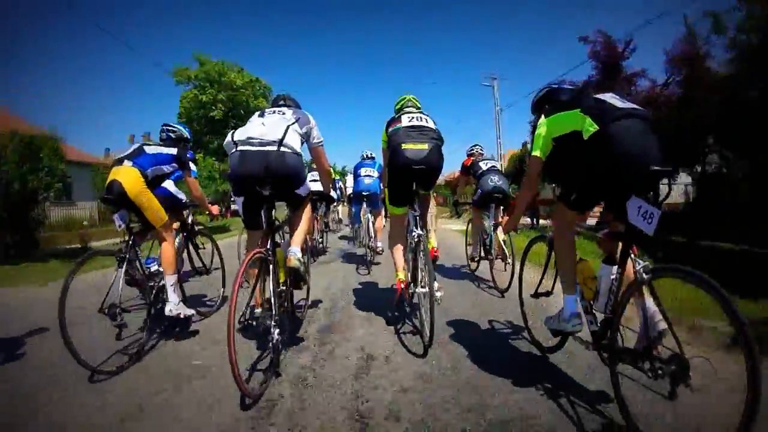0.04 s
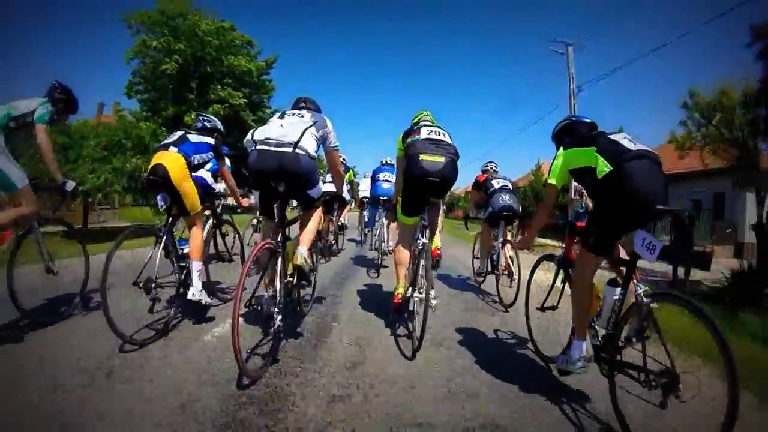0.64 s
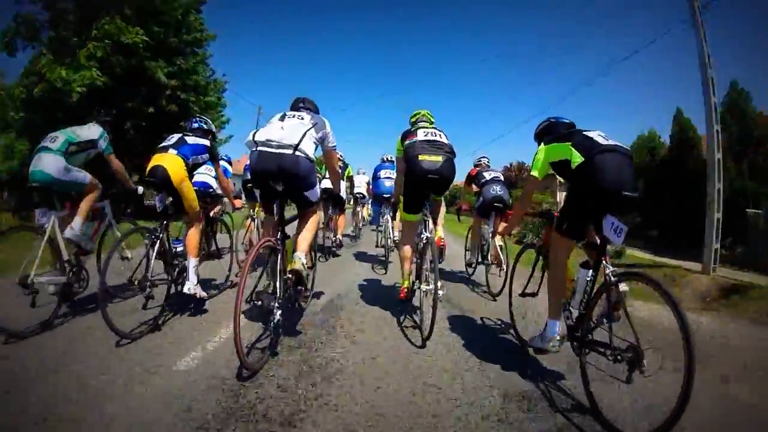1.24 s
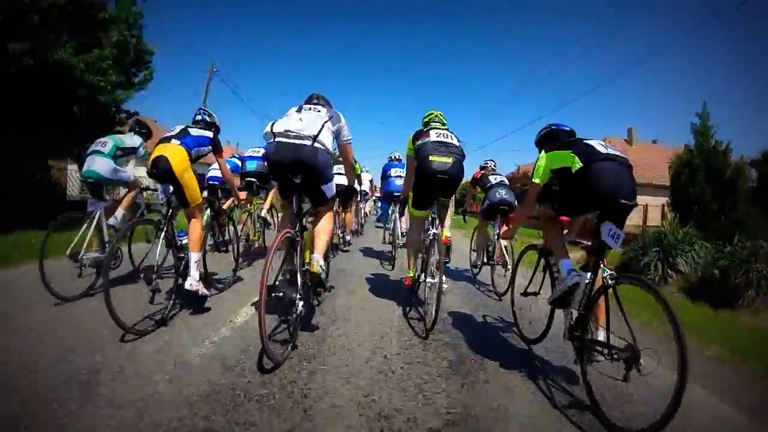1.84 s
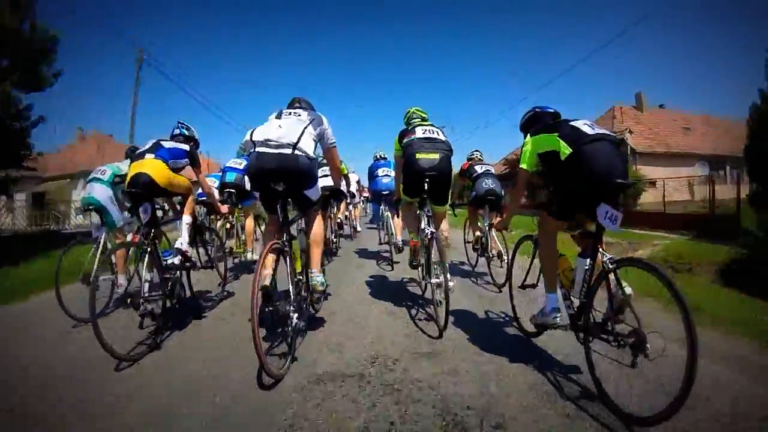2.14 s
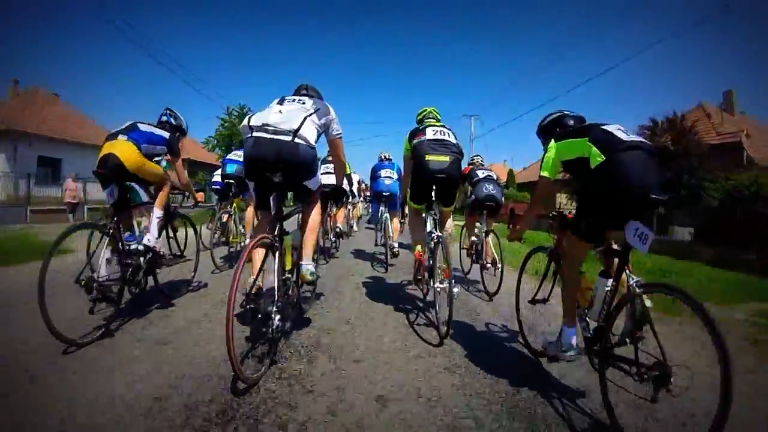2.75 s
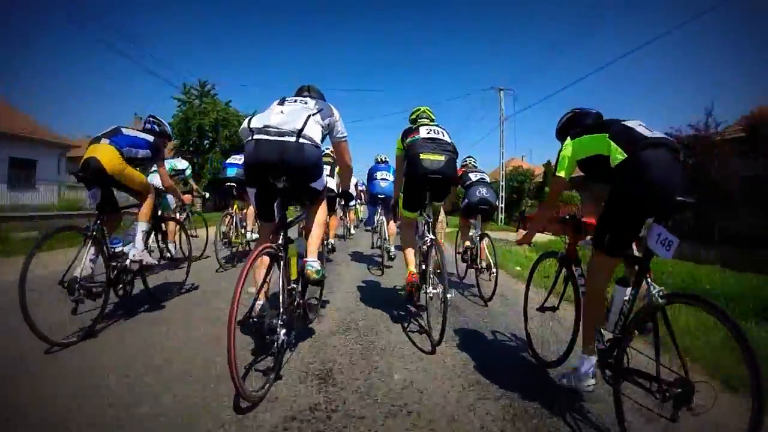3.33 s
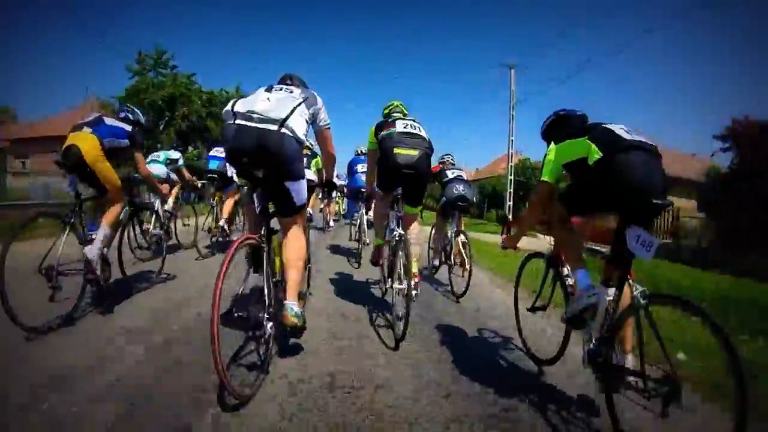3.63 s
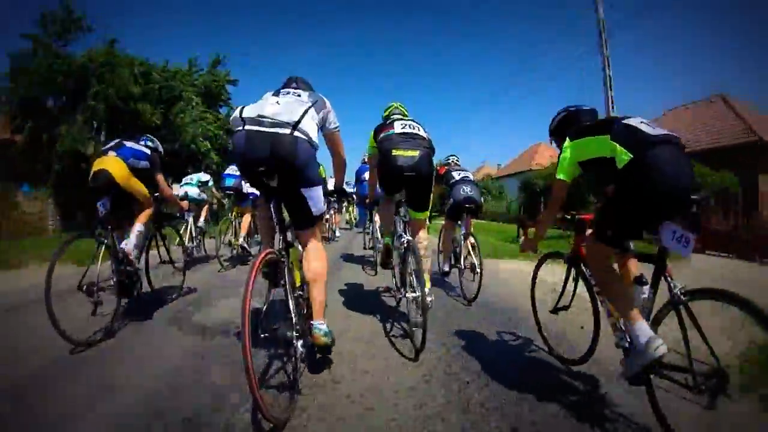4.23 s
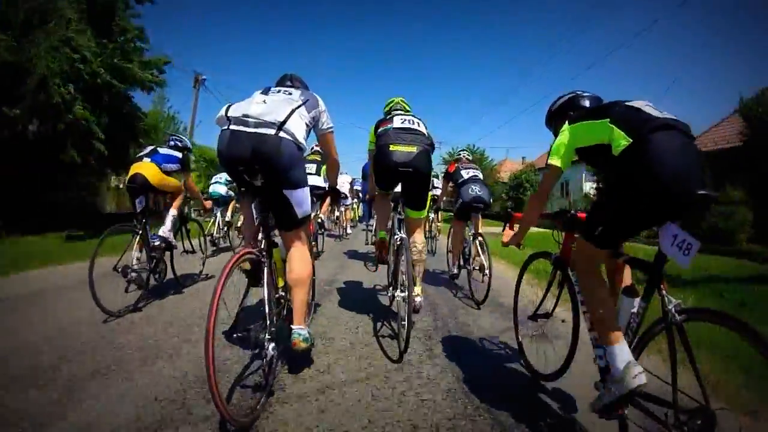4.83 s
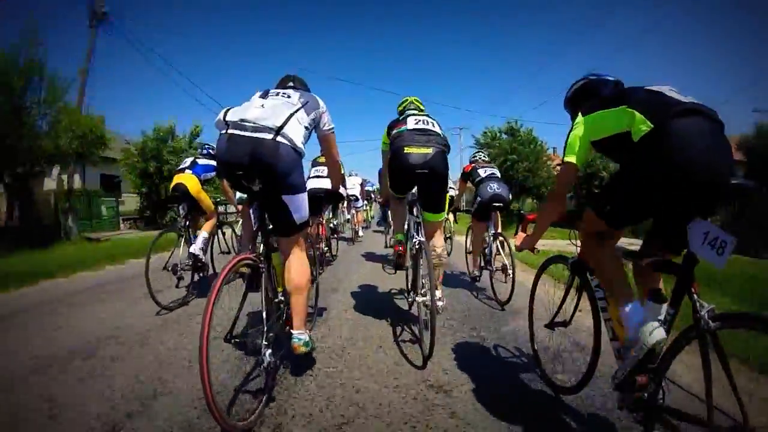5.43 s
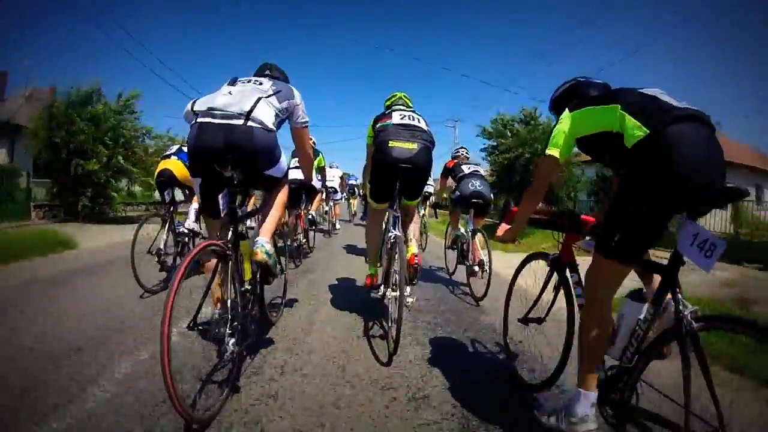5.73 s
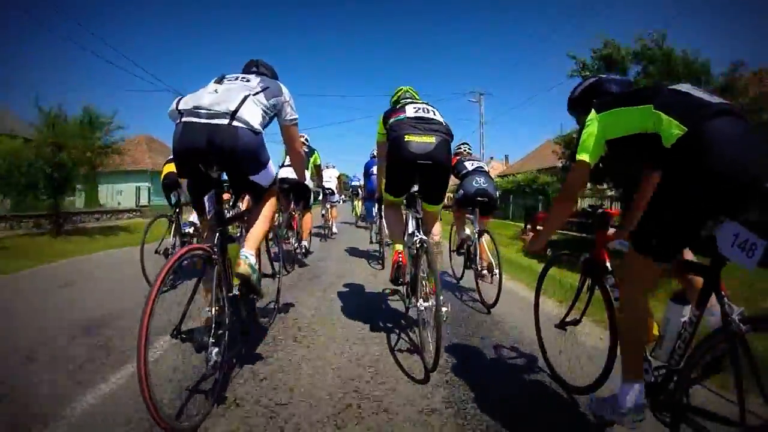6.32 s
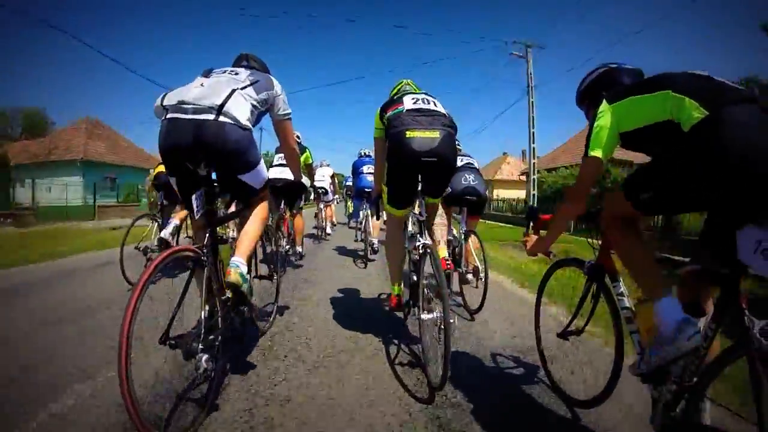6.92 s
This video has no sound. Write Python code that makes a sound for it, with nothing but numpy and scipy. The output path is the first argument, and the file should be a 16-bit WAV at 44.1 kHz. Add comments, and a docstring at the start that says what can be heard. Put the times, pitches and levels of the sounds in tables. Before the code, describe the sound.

Short, hard plastic knocks clatter constantly over the low road rumble of a bicycle riding fast in a pack.

```python
"""A camera rides on a racing bicycle in a fast pack on coarse asphalt.
From the start the road shakes frame and mount into a low rumble, with wind and tyre hiss behind it.
The plastic camera case chatters in its mount, and chains and grit tick finely.
A moment later the first bump sets the case rattling with short, hard knocks.
Bump follows bump, over all the other sounds, to the end of the seven seconds."""
import sys
import numpy as np
from scipy import signal
from scipy.fft import rfft, irfft
from scipy.io import wavfile
from scipy.ndimage import uniform_filter1d

SR = 44100
rng = np.random.default_rng(int(sys.argv[2]) if len(sys.argv) > 2 else 0)


def transcribe(u):
    """Save the signal u as a 16-bit wav file named by the first command-line argument.

    u: samples, shape (n,) or (channels, n), limited to [-1, 1]; the rate is SR.
    q: integer samples, one column per channel.
    """
    v = np.clip(np.atleast_2d(u).T, -1, 1)
    q = np.round(v * 32767).astype(np.int16)
    wavfile.write(sys.argv[1], SR, q)


N = 311787


def from_db(db):
    return 10 ** (np.asarray(db) / 20)


def rms_one(x):
    """Scale a sound so that its average strength (rms) is 1."""
    return x / np.sqrt(np.mean(x ** 2) + 1e-20)


def in_time(rows):
    """Join (time, level) points with straight lines, giving a level for every sample."""
    return np.interp(np.arange(N) / SR, *np.transpose(rows))


def keep_band(x, hz, side):
    """Keep the "low" or the "high" side of a pitch and fade out the other."""
    return signal.sosfilt(signal.butter(2, hz, side, fs=SR, output="sos"), x)


def resonate(x, hz, width_hz):
    """Let a sound ring at one pitch; a narrower width rings longer."""
    return signal.lfilter(*signal.iirpeak(hz, hz / width_hz, fs=SR), x + 1e-18)


def resonate_twice(x, hz, width_hz):
    """Ringing twice over lets less of the neighbouring pitches through."""
    return resonate(resonate(x, hz, width_hz), hz, width_hz)


def road_shaking(tones, level_db, steady_s=0.16):
    """The rough road pushes at random and makes a part ring at its own low tones."""
    ringing = 0
    for hz, width_hz, db in tones:
        road = rng.standard_normal(N + SR)  # a spare second lets the ringing build up
        ringing += from_db(db) * resonate_twice(road, hz, width_hz)[SR:]
    power = uniform_filter1d(ringing ** 2, int(steady_s * SR))
    return from_db(level_db) * ringing / np.sqrt(power + 1e-18)


# The tones at which the frame rings: (pitch [Hz], width [Hz], level [dB])
FRAME_TONES = [(39.9, 12, -6), (43.35, 7.6, -2), (61.97, 4.5, 3.5), (70.1, 6.6, -13.5)]
# How hard the road shakes the frame: (time [s], level [dB])
FRAME_LEVELS = [(0.0, -15), (0.08, -18), (1.42, -23), (1.56, -13.5), (1.65, -25), (1.79, -16),
                (2.54, -24.5), (2.7, -16), (2.91, -25), (2.99, -15.5), (3.31, -27.5), (3.54, -15),
                (3.94, -20), (4.17, -15), (4.27, -25), (4.35, -17), (5.26, -21), (5.32, -32), (5.45, -17),
                (5.61, -23), (5.87, -15), (5.98, -29), (6.16, -12.5), (6.22, -28), (6.3, -16), (6.56, -29),
                (6.59, -16.5), (7.07, -25)]
def frame_rumble():
    """The road shakes the bicycle frame into a deep, uneven rumble."""
    return road_shaking(FRAME_TONES, in_time(FRAME_LEVELS))


# The tones at which the camera mount rings: (pitch [Hz], width [Hz], level [dB])
MOUNT_TONES = [(96.1, 16.8, -2.5), (109.7, 7.9, -4), (126.8, 8.56, 5.5), (141.5, 32.2, -2),
               (160.3, 25.6, -14.5), (214, 19.4, -20.5), (281, 27, -34)]
# How hard the road shakes the mount: (time [s], level [dB])
MOUNT_LEVELS = [(0.0, -21), (0.27, -14), (0.39, -22), (0.73, -16.5), (0.81, -22.5), (0.85, -17.5),
                (1.58, -19), (1.63, -10), (1.67, -23), (1.75, -16.5), (2.26, -17.5), (2.34, -25),
                (2.36, -5.5), (2.4, -29), (2.48, -13), (2.83, -22), (2.89, -14), (3.03, -24), (3.25, -13),
                (3.68, -19), (3.7, -14), (4.51, -18), (6.99, -16.5), (7.07, -17.5)]
def mount_buzz(pedal_hz=2.95, first_push_s=0.27, swell_db=1.0):
    """The mount buzzes about an octave above the frame and swells with each push on a pedal."""
    push_db = swell_db * np.cos(2 * np.pi * pedal_hz * (np.arange(N) / SR - first_push_s))
    return road_shaking(MOUNT_TONES, in_time(MOUNT_LEVELS) + push_db)


def steady_noise(colour):
    """An even rush whose colour says how strong each pitch is."""
    hz, db = np.transpose(colour)
    pitches = np.maximum(np.fft.rfftfreq(N, 1 / SR), 1)
    gains = from_db(np.interp(np.log(pitches), np.log(hz), db))
    return rms_one(irfft(rfft(rng.standard_normal(N)) * gains, N))


# The dark colour of the wind: (pitch [Hz], level [dB])
WIND_COLOUR = [(10, -11), (25, -2), (70, -13.5), (160, 11.5), (250, -12.5), (400, -13), (600, -32),
               (8000, -95)]
def wind(level_db=-32):
    """Air rushes over the camera case."""
    return from_db(level_db) * steady_noise(WIND_COLOUR)


# The brighter colour of the tyre hiss: (pitch [Hz], level [dB])
TYRE_COLOUR = [(350, 4.5), (620, -0.5), (850, 3.5), (1100, 3.5), (1400, -0.5), (1800, 4), (2600, -5),
               (3300, -13.5), (6000, -24), (9000, -33.5), (15000, -43)]
def tyres(hiss_db=-44, hum_db=-43):
    """Many tyres roll on asphalt with an even hiss and a hollow hum."""
    hum = resonate_twice(rng.standard_normal(N), hz=380, width_hz=65)
    return from_db(hiss_db) * steady_noise(TYRE_COLOUR) + from_db(hum_db) * rms_one(hum)


def random_taps(per_s, spread_db):
    """Taps at random moments, most small and a few large."""
    sizes = from_db(spread_db * np.clip(rng.standard_normal(N), -3, 1.6))
    return rms_one((rng.random(N) < per_s / SR) * sizes)


def scuff(taps, decay_s):
    """Rough surfaces touch at many tiny points, so each tap becomes a short burst of noise."""
    fade = np.exp(-2 / (decay_s * SR))
    power = signal.lfilter([1 - fade], [1, -fade], taps ** 2 + 1e-18)
    return np.sqrt(power) * rng.standard_normal(N)


# Pitches that the case makes louder (+) or softer (-): (pitch [Hz], width [Hz], boost [dB])
CASE_TONES = [(927, 280, 3.5), (1082, 105, -12.5), (1288, 125, 8), (1542, 139, 19.5), (1704, 71, -10),
              (2059, 123, 10.5), (2491, 186, 14.5), (3080, 550, 8.5), (3590, 75, -11.5), (4123, 236, 13),
              (5040, 177, 10), (6390, 390, 9), (8020, 410, -15), (8430, 930, 19), (11600, 370, 10.5),
              (14000, 950, 11.5)]
def plastic_case(force, thud_db=-10):
    """The shell favours middle pitches and rings very briefly; its mount adds a dull thud."""
    shell = keep_band(keep_band(force, 600, "high"), 1500, "low")
    for hz, width_hz, boost_db in CASE_TONES:
        shell = shell + (from_db(boost_db) - 1) * resonate(shell, hz, width_hz)
    thud = resonate_twice(force, hz=450, width_hz=480)
    return shell - from_db(thud_db) * thud


# How loosely the case chatters between knocks: (time [s], level [dB])
CHATTER_LEVELS = [(0.0, -30.5), (0.45, -37.5), (1.08, -33.5), (1.4, -31), (2.5, -36.5), (2.87, -34),
                  (2.99, -33), (3.7, -35), (4.02, -33), (4.29, -32), (4.86, -32), (4.98, -30), (5.79, -34),
                  (6.3, -28.5), (6.5, -34), (7.07, -30)]
def chatter(motion, rub_db=-4, taps_db=-2, grip=3.3, limit=0.36):
    """The case rubs on every forward swing of the mount and also taps lightly at random."""
    forward_swing = np.maximum(keep_band(motion, 85, "high"), 0)
    pressure = np.tanh(forward_swing / limit) ** grip  # slack in the mount limits the pressure
    rub = keep_band(pressure * rng.standard_normal(N), 2800, "low")
    taps = scuff(random_taps(per_s=150, spread_db=9.5), decay_s=0.00023)
    rubbing = from_db(rub_db) * rms_one(plastic_case(rub))
    tapping = from_db(taps_db) * rms_one(plastic_case(keep_band(taps, 5000, "low")))
    return from_db(in_time(CHATTER_LEVELS)) * (rubbing + tapping)


# The bright colour of the ticks: (pitch [Hz], width [Hz], level [dB])
TICK_TONES = [(3880, 1130, 3), (6100, 5600, -2.5), (8500, 2700, -4), (11260, 1100, -9.5),
              (14200, 1900, -13.5)]
def ticking(knocking, level_db=-54, follow_shaking=0.54, follow_knocks=0.099, flare_s=0.12):
    """Chains and grit make tiny ticks, louder when the bicycle shakes or hits a bump."""
    taps = random_taps(per_s=250, spread_db=3.5)
    ticks = 0
    for hz, width_hz, db in TICK_TONES:
        colour_db = 3.5 * np.clip(rng.standard_normal(N), -2, 2)  # each tick gets its own colour
        burst = scuff(taps * from_db(colour_db), decay_s=0.0014)
        ticks += from_db(db) * resonate_twice(burst, hz, width_hz)
    shaking_db = in_time(MOUNT_LEVELS) + in_time(CHATTER_LEVELS)
    knock_power = uniform_filter1d(rms_one(knocking) ** 2, int(flare_s * SR))
    knock_db = 10 * np.log10(0.5 + knock_power)
    swell = from_db(follow_shaking * shaking_db + follow_knocks * knock_db)
    return from_db(level_db) * rms_one(ticks * swell)


# Bumps in the road that set the case bouncing in its mount:
# (time [s], knocks [count], gap [s], first level [dB], change per knock [dB], extra treble [dB])
BUMPS = [(0.0227, 3, 0.019, -12, 0, 1), (0.1174, 3, 0.024, -6, 0, 0), (0.3403, 1, 0, -1, 12, 0),
         (0.4049, 2, .042, -2.5, -.5, 1.5), (0.5288, 2, 0.024, -1.5, -3.5, 8.5),
         (0.5717, 2, 0.012, -8.5, 7.5, -1), (0.68, 2, 0.013, -3, -7, 5), (0.9554, 2, 0.029, -8.5, 2, 3),
         (1.0549, 2, 0.029, -6, -9.5, 2), (1.1588, 3, 0.024, -5.5, -2, 1),
         (1.2798, 2, .027, -4.5, -0.5, -2), (1.359, 2, 0.029, -5.5, -5.5, -1),
         (1.4475, 2, 0.03, -6.5, -1, -3), (1.543, 2, 0.024, -5.5, -0.5, 0), (1.706, 1, 0, -8, 5, -6),
         (1.7567, 3, 0.027, -11.5, 2.7, 3.5), (1.8487, 1, 0.0045, -5, 0, -1.5),
         (1.91, 2, .0256, -10, 0, -1.5), (1.999, 1, 0, 0, 0, -7.5), (2.0319, 3, 0.025, -1, -2.8, 3),
         (2.119, 3, 0.056, -8, 0.5, -12), (2.2665, 3, .0265, -11.5, 3.5, -2), (2.4216, 1, 0, -6, 2, -6),
         (2.5106, 2, .039, -10, 2, -3), (2.598, 2, 0.0094, -9, 3, 5.5), (2.652, 2, 0.019, -9.5, -4, 5.5),
         (2.7085, 3, 0.027, -4, -1, 4), (2.7902, 2, 0.027, -4, 0.5, 0.5), (2.8945, 2, 0.018, -6, -4, -6),
         (2.9464, 3, .0252, -5, -0.1, 4.4), (3.0411, 1, 0, -8.5, -5, 1.5), (3.2748, 2, 0.029, -6.5, -9, 4),
         (3.3798, 1, 0, -2, -2, -4), (3.5056, 1, 0.0016, -8, -8, -1), (3.8521, 2, .03, -7, 4, 3),
         (3.961, 2, 0.023, -5.5, 0, 1), (4.0201, 2, 0.026, -6.5, 8, -1.5),
         (4.1308, 4, 0.029, -7.5, -1, 1.5), (4.5178, 2, 0.031, -7, -1, -1.5),
         (4.652, 2, 0.023, -5, 1.5, 3.5), (4.7004, 2, 0.021, -5.5, 0, 2.5),
         (4.7271, 4, 0.028, -2, -0.6, 4.5), (4.867, 1, 0, -3, 17, 1.5), (4.9301, 2, 0.047, -2, -3.5, -2),
         (5.1678, 2, 0.034, -5, -4.5, -0.5), (5.2862, 1, 0.00066, -8, -2, 2.5),
         (5.4317, 2, 0.022, -4.5, 0, -3), (5.4799, 3, 0.03, -3.5, -1.5, 1.5),
         (5.7935, 3, 0.027, -3, -3.5, 1.5), (5.8964, 1, 0, -7, -7, 1.5), (6.0567, 2, .0357, -5.5, -3, 0),
         (6.1163, 4, 0.032, -5, -0.6, 3), (6.266, 2, 0.022, -8, -3, 3), (6.403, 3, 0.027, -7.5, 1.5, 6.5),
         (6.5119, 1, 0, -8.5, 21, 3), (6.562, 2, 0.028, -6.5, 4.5, 0.5), (6.698, 3, 0.026, -10, 2, 3),
         (6.7712, 2, 0.026, -1, -3, 2.5), (6.855, 3, 0.029, -8.5, 1.6, 5),
         (6.9757, 2, 0.076, -12.5, 4.5, 3.5)]
def bump_knocks():
    """Each bump gives one knock or an even run: (time [s], level [dB], extra treble [dB])."""
    return np.array([(start_s + k * gap_s, first_db + k * change_db, treble_db)
                     for start_s, count, gap_s, first_db, change_db, treble_db in BUMPS
                     for k in range(int(count))])


def stray_knocks(taken_s, bounce_s=0.024, touch_share=0.3, follow_chatter=0.7):
    """Between bumps the case bounces on, at times knocking weakly; same columns as bump_knocks."""
    slip, chance, strength, hardness = rng.standard_normal((300, 4)).T
    time_s = np.cumsum(bounce_s * np.exp(0.15 * slip))
    loose_db = np.interp(time_s, *np.transpose(CHATTER_LEVELS))
    level_db = -12 + follow_chatter * (loose_db - loose_db.mean()) + 1.5 * np.minimum(strength, 1)
    treble_db = -1 + 4 * hardness
    free = np.abs(time_s[:, None] - taken_s).min(axis=1) > 0.7 * bounce_s
    touches = chance < np.quantile(chance, touch_share)
    return np.column_stack([time_s, level_db, treble_db])[free & touches & (time_s < N / SR)]


def knocks(gain_db=6, treble_hz=3000, scuff_db=-6.5, scuff_s=0.0013):
    """Each knock on the case is a hit, a brief scuff and one rebound; harder contact is brighter."""
    runs = bump_knocks()
    time_s, level_db, treble_db = np.vstack([runs, stray_knocks(taken_s=runs[:, 0])]).T
    # every rebound has its own delay and strength, so no two knocks sound alike
    delay_s, rebound = rng.uniform([0.0004, 0.25], [0.0016, 0.7], (500, 2))[:len(time_s)].T
    force, treble_force = np.zeros(N), np.zeros(N)
    for when_s, share in ((time_s, 1), (time_s + delay_s, rebound)):
        at = np.clip(np.round(when_s * SR).astype(int), 0, N - 1)
        force[at] += share * from_db(level_db + gain_db)
        treble_force[at] += share * from_db(level_db + gain_db + treble_db)
    body, edge = (f + from_db(scuff_db) * scuff(f, scuff_s) for f in (force, treble_force))
    return plastic_case(keep_band(body, treble_hz, "low") - keep_band(edge, treble_hz, "high"))


def scene():
    """Add up all the sounds in one channel; the rumble drives the rubbing, the knocks lift the ticks."""
    motion = frame_rumble() + mount_buzz()
    knocking = knocks()
    return (motion + knocking + chatter(motion) + ticking(knocking) + wind() + tyres())[None]


def record(dry, top_hz=15400):
    """Round off the loudest peaks and cut away the very highest treble."""
    rounded = dry / (1 + dry ** 6) ** (1 / 6)
    return signal.sosfilt(signal.ellip(10, 0.1, 80, top_hz, fs=SR, output="sos"), rounded)


dry = scene()
out = record(dry)
transcribe(out)
```